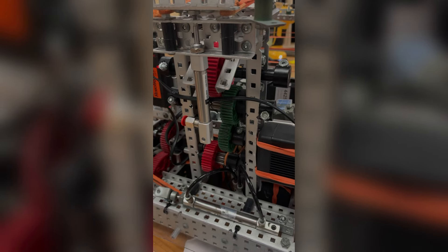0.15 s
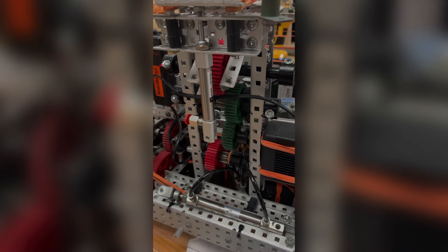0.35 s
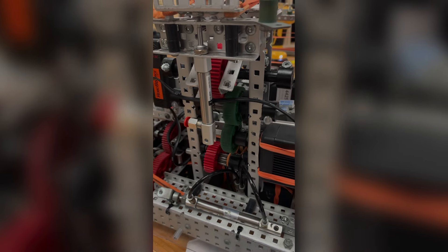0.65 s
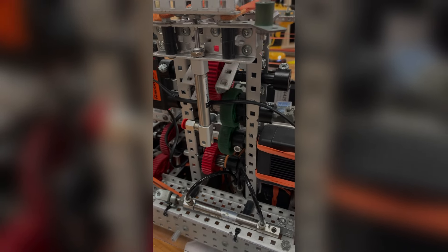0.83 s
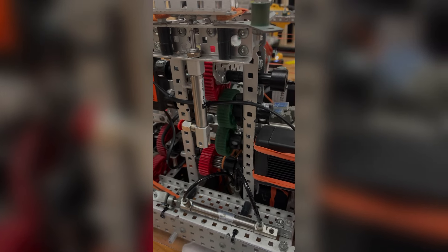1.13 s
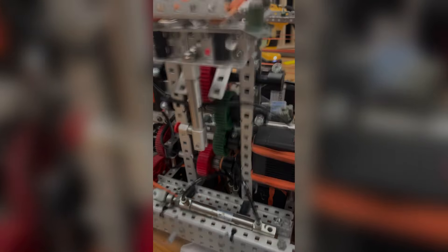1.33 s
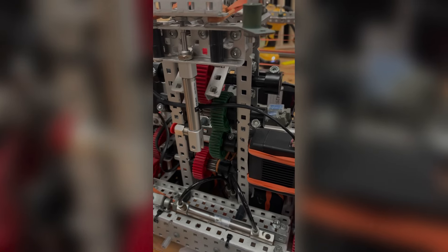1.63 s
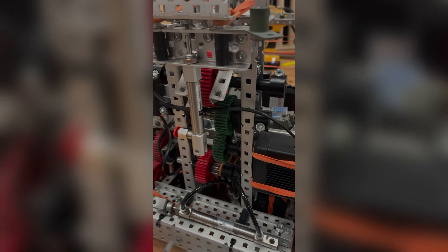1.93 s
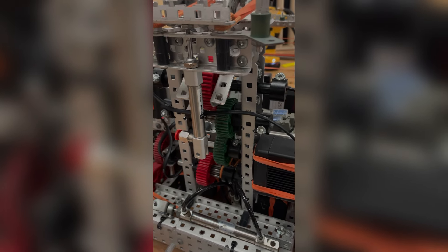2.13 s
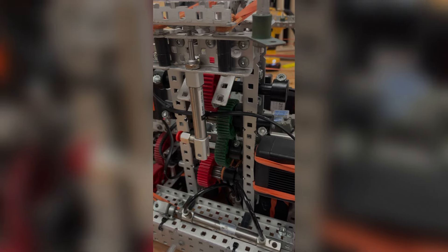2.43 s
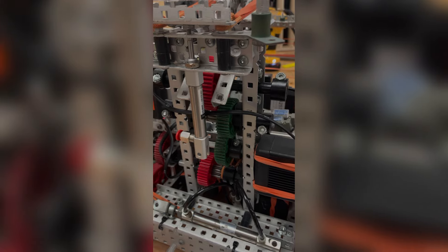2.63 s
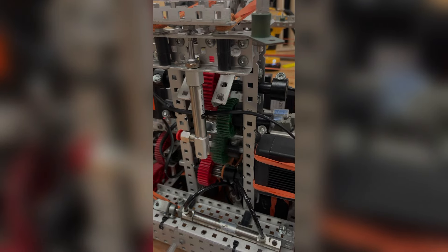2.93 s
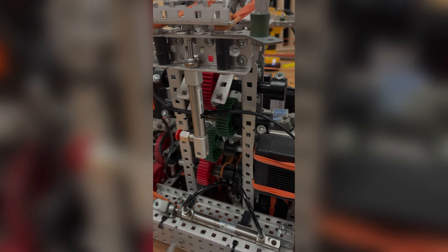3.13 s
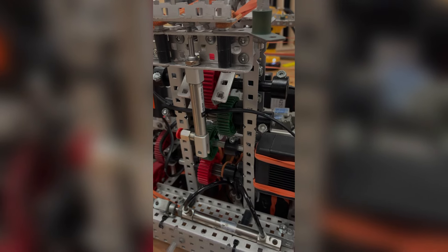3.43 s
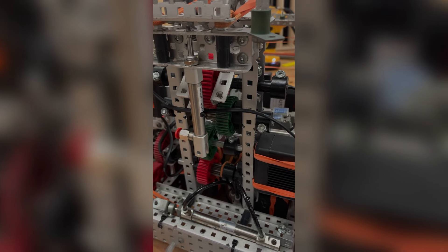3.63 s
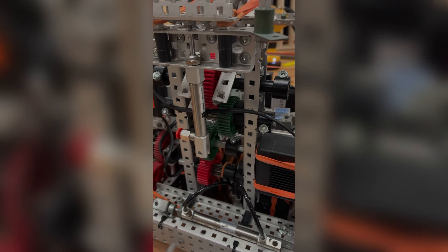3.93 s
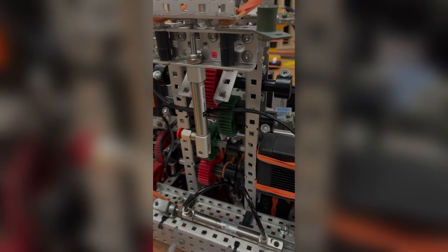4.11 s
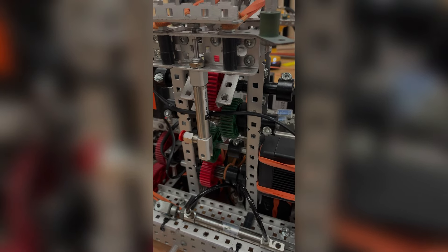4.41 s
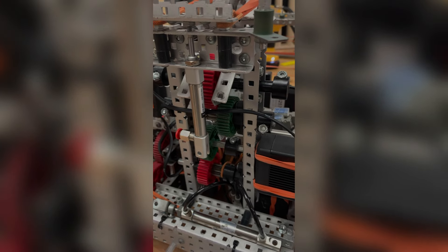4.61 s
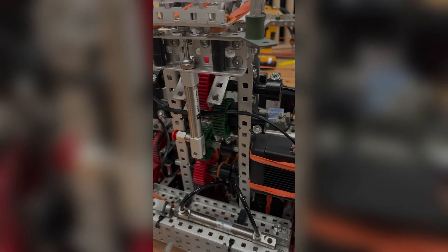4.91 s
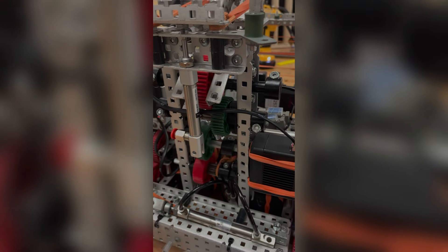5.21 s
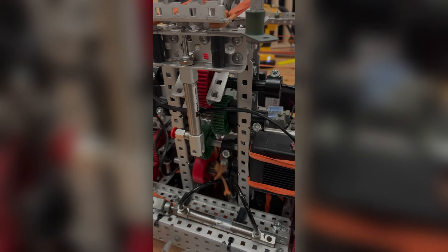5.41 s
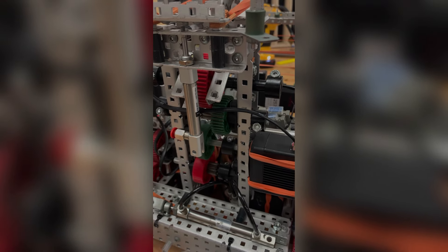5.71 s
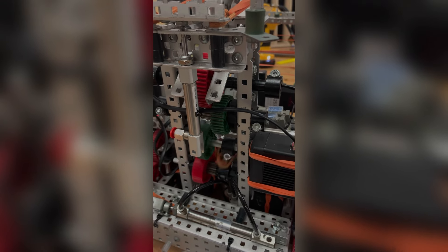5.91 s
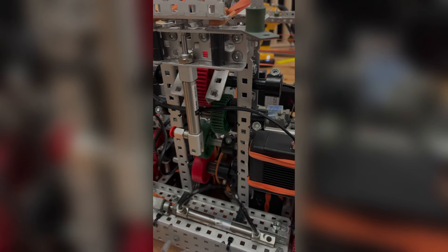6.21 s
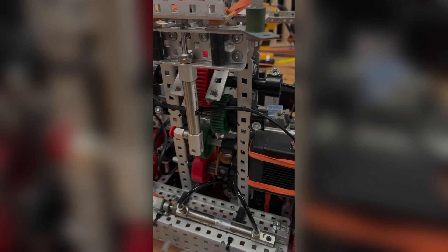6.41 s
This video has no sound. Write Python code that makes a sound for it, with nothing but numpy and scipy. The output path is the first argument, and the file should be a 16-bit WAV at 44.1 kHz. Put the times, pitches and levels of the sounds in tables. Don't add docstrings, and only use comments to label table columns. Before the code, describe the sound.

Close phone pickup of a small metal robot on a workshop bench. After faint handling, a geared motor snaps on, spins up, then sags into a strained whine. It stops amid a rattling cluster of metal slams, air hiss and low frame thumps. Quiet follows, broken by sharp plate clacks and small valve puffs, before the motor restarts with a lighter whir that runs to the end.

```python
import sys
import numpy as np
from scipy import signal
from scipy.fft import rfft, irfft, next_fast_len
from scipy.io import wavfile
from scipy.ndimage import uniform_filter1d, minimum_filter1d, map_coordinates

SR = 44100
rng = np.random.default_rng(int(sys.argv[2]) if len(sys.argv) > 2 else 0)


def amplitude_ratio(level_db):
    exponent = np.asarray(level_db, float) / 20
    return 10 ** exponent


def materialize(psi):
    bounded = np.clip(np.atleast_2d(psi).T, -1, 1)
    quanta = np.round(bounded * 32767).astype(np.int16)
    wavfile.write(sys.argv[1], SR, quanta)


N = 289296

# time in seconds, gear hiss in dB, tooth strain in dB.
LOADED_RUN = [
    (0.581, -58, -17),
    (0.599, -27, -8),
    (.63, -24, -16),
    (0.689, -18, -18.5),
    (.8, -19, -10),
    (0.825, -22.5, -3),
    (1.0, -24.5, -3.5),
    (1.14, -26.5, -2.5),
    (1.271, -27.5, 1),
]
# frequency in Hz, lead in half turns.
PORT_LEAD = [(350, -.16), (600, -.42), (1100, -.5), (1450, .25), (2400, .7), (3100, .35), (4640, 1),
             (6900, 2)]
COAST_S = 0.027


def unit(x):
    return x / np.sqrt(np.mean(x ** 2) + 1e-20)


def colour(points):
    f, db = np.transpose(points)
    return lambda hz: amplitude_ratio(np.interp(np.log(hz + 1), np.log(f), db))


def curves(rows):
    s, *cols = np.transpose(rows)
    return [np.interp(np.arange(N) / SR, s, c) for c in cols]


def wobble(rate_hz):
    knots = rng.standard_normal(int(N * rate_hz / SR) + 4)
    fine = map_coordinates(knots, [np.arange(8 * len(knots)) / 8])
    return np.interp(np.arange(N) * rate_hz * 8 / SR, np.arange(len(fine)), fine)


def filtered(x, response):
    m = next_fast_len(N + SR // 2)
    return irfft(rfft(x, m) * response(np.fft.rfftfreq(m, 1 / SR)), m)[..., :N]


def modes(table):
    def response(f):
        total = 0
        for k, (centre, width, db) in enumerate(table):
            total = total + (-1) ** k * amplitude_ratio(db) * 1j * f * width / (centre ** 2 - f * f + 1j * f * width)
        return total
    return response


def field(shape, tall, wide):
    rough = uniform_filter1d(rng.standard_normal(shape), tall, 0)
    return unit(uniform_filter1d(uniform_filter1d(rough, tall, 0), wide, 1))


def rush(response, patchy_db):
    _, _, z = signal.stft(rng.standard_normal(N), SR, nperseg=512)
    patched = signal.istft(z * amplitude_ratio(patchy_db * field(z.shape, tall=4, wide=8)), nperseg=512)[1][:N]
    return unit(filtered(patched, response))


def swells(rows):
    t, power = np.arange(N) / SR, 0
    for s, *db, rise, t60 in rows:
        u = np.maximum(t - s, 0)
        fall = amplitude_ratio(-60 * np.maximum(u - rise, 0) / max(t60, .03))
        shape = np.minimum(u / max(rise, .002), 1) ** 2 * fall
        power = power + (amplitude_ratio(db)[:, None] * shape) ** 2
    return np.sqrt(power)


def drive():
    # time in seconds, gear hiss in dB, tooth strain in dB.
    light_run = [
        (4.996, -36, -16),
        (5.022, -24, -21),
        (5.05, -18, -27),
        (5.23, -19.5, -15),
        (5.3, -20, -24),
        (5.313, -26.5, -15),
        (5.62, -25, -26),
        (6.0, -25, -13.5),
        (6.56, -25, -17.5),
    ]

    def off(row, shift_s):
        return (row[0] + shift_s, -110, row[2])

    first, last, again = LOADED_RUN[0], LOADED_RUN[-1], light_run[0]
    return curves([off(first, -COAST_S), *LOADED_RUN, off(last, 2 * COAST_S), off(again, -COAST_S), *light_run])


def motor():
    # time in seconds, speed in turns/s.
    rotor_speed = [(.56, 212), (.62, 200), (.69, 222), (.8, 222), (.832, 172), (.87, 169), (.888, 162),
                   (.925, 164), (.945, 160), (.986, 161.5), (1.002, 158), (1.044, 159.5), (1.07, 150),
                   (1.146, 144.5), (1.196, 146), (1.218, 140), (1.255, 145), (1.3, 143), (4.9, 225)]
    # multiple of the tooth rate, level in dB.
    mesh = [(1, -3), (2, 1), (3, 5), (4, 2), (5, -1), (6, -6)]
    # frequency in Hz, width in Hz, level in dB.
    case = [(452, 40, -27), (1360, 300, -16), (1950, 400, -17), (2950, 800, -9), (4500, 1500, -11),
            (5600, 450, -5.5), (7080, 500, -.5), (8250, 400, 0), (9100, 900, -8), (9730, 200, -7),
            (10250, 400, -8), (11200, 400, -1), (12050, 300, -9), (12900, 1200, -13), (15000, 1800, -13)]
    mount_hz, mount_width_hz = 166, 30

    (speed,), (hiss_db, strain_db) = curves(rotor_speed), drive()
    slack = np.clip((speed - 175) / 45, 0, 1)
    turn = 2 * np.pi * np.cumsum(speed * (1 + (.004 + .018 * slack) * wobble(90))) / SR
    stage = np.cos(turn / 4.0 + 1.7 * wobble(3.3))
    throb_db = (2.5 - 1.1 * slack) * stage + 1.5 * np.cos(turn) + wobble(300) + wobble(25)
    hiss = unit(amplitude_ratio(throb_db) * rush(modes(case), patchy_db=2.4))

    grid_hz = np.arange(500, SR // 2, 50)
    case_gain = np.abs(modes(case)(grid_hz)) ** .6
    whine = 0
    for k, db in mesh:
        level = amplitude_ratio(db + 3 * wobble(45)) * np.interp(10 * k * speed, grid_hz, case_gain)
        whine = whine + level * np.sin(10 * k * turn + .5 * wobble(400))

    surge, = swells([(LOADED_RUN[0][0] - COAST_S, -40, .03, 0.4)])
    detune = 2 * (speed - mount_hz) / mount_width_hz
    hum_gain = amplitude_ratio(hiss_db - 26 + 0.75 * strain_db + 2 * wobble(33) + 5) / np.sqrt(1 + detune ** 2) + surge
    hum = (np.sin(turn) + amplitude_ratio(-12.5) * np.sin(2 * turn)) * hum_gain
    gears = hiss + amplitude_ratio(strain_db + 1.0 + 1.9 * stage) * whine
    return amplitude_ratio(hiss_db + 0.57 * wobble(9.4)) * gears + amplitude_ratio(2) * hum


def slams():
    # start in seconds, crack, knock and thud in dB, chatter t60 in seconds.
    contacts = [(0.4294, -63, -54, -61, .028), (0.5799, -16, -35, -57.5, 0.012),
                (0.611, -11.5, -37.5, -57, 0.024), (1.278, -10.5, -25.5, -28.5, .025),
                (1.3397, -12, -25.5, -49.5, .03), (1.3453, -3, -30, -45.5, 0.022),
                (1.3527, -4.5, -27.5, -33.5, .03), (1.3559, -8, -29, -33, 0.033),
                (1.359, -8.5, -28, -36, 0.037), (1.3674, -10, -28, -35, 0.027),
                (1.4297, -10.5, -33.5, -25.5, 0.023), (1.4329, -13, -32.5, -30.5, .02),
                (1.5068, -17.5, -35.5, -32, 0.015), (1.5108, -5, -37, -32, 0.024),
                (1.581, -6.5, -35, -29.5, 0.017), (1.6327, -12, -44, -26.5, 0.022),
                (1.652, -23, -51, -30.5, 0.023), (1.4499, -15.5, -45.5, -52.5, 0.023),
                (1.472, -19.5, -44.5, -49, 0.027), (1.9147, -50.5, -42.5, -35, 0.15),
                (2.8959, -23.5, -29, -41.5, 0.013), (2.9371, -28, -40, -32, 0.042),
                (2.9427, -2.5, -13.5, -21, 0.016), (2.9458, -8.5, -34, -10, 0.022),
                (2.9507, -16.5, -21, -39, 0.044), (3.1469, -32, -43, -59.5, 0.035),
                (3.152, -1.5, -20, -46, .015), (3.1538, -9, -22, -67, 0.019),
                (3.394, -38, -78.5, -80.5, 0.0065), (3.7187, -7, -18.5, -41.5, 0.016),
                (3.7255, -16.5, -18.5, -49.5, 0.02), (3.759, -20.5, -33, -25, 0.037),
                (3.7659, -5, -15, -11.5, 0.024), (3.7686, -7, -17, -15.5, 0.013),
                (3.7745, -15, -36, -17.5, 0.012), (4.9863, -17.5, -33, -50, 0.0088),
                (4.997, -16, -36, -58, 0.0117), (2.632, -64, -55, -80, 0.015),
                (5.301, -14, -36, -57, 0.009)]
    # frequency in Hz, level in dB.
    crack_colour = [(1500, -20.5), (3000, -11), (5500, 5.5), (8000, -1.5), (11000, 0.5), (14500, -2.5),
                    (16000, -3.5)]
    # frequency in Hz, width in Hz, level in dB.
    channel = [(2700, 470, -24.5), (5580, 360, 5.5), (6970, 43, 1), (6900, 390, 4.5), (7490, 17, -7),
               (7060, 57, -9), (8600, 90, -1.5), (9400, 350, 4), (10030, 260, -3.5), (11000, 200, -2.5),
               (13000, 81, -5.5), (13800, 150, -5.5)]
    plates = modes([(1150, 33, -1.0), (2150, 460, 0.5), (744, 140, -2.0)])

    crack, knock, thud, t = np.zeros(N), np.zeros(N), np.zeros(N), np.arange(SR // 8) / SR
    push = np.sin(2 * np.pi * 10.0 * np.sqrt(t * 8.5))
    chatter = rng.standard_normal((len(contacts), 2, len(t)))
    for (s, db, knock_db, thud_db, t60), z in zip(contacts, chatter):
        fall = amplitude_ratio(-60 * t / max(t60, .006)) * (1 - np.exp(-t / 0.00023))
        at = slice(round(s * SR), round(s * SR) + len(t))
        crack[at] += amplitude_ratio(db - 1.5) * fall * z[0]
        knock[at] += amplitude_ratio(knock_db + 12.5) * fall * z[1]
        thud[at] += amplitude_ratio(thud_db - 1.5 - 60 * t / 0.048) * (1 - np.exp(-t / .0008)) * push

    def ringing(hz):
        return colour(crack_colour)(hz) * amplitude_ratio(0.5) + amplitude_ratio(4) * modes(channel)(hz)

    return filtered(crack, ringing) + filtered(knock, plates) + thud


def bumps():
    # start in seconds, level in dB, pitch in Hz.
    drops = [
        (1.3712, -7, 90),
        (1.4075, -13.5, 133.7),
        (1.418, -14.5, 94.4),
        (1.4492, -16, 115),
        (1.4761, -9, 120),
        (1.4843, -10, 100),
    ]
    out, t = np.zeros(N), np.arange(SR // 8) / SR
    for s, db, hz in drops:
        swing = amplitude_ratio(db + 5.5 - 60 * t * hz / 2.3) * np.sin(2 * np.pi * hz * t)
        out[round(s * SR):][:len(t)] += swing * (1 - np.exp(-t / 0.0028))
    return out


def knocks():
    # start in seconds, level in dB, pitch in Hz, upper tick in dB.
    plastic = [(0.536, -25.5, 563, -14.5), (0.684, -28, 690, 8), (1.402, -26, 274, -9),
               (1.574, -6, 428, -37), (1.576, -16, 386, -28), (1.597, -12, 287, -34),
               (1.584, -16, 300, -34), (1.884, -32.5, 1027, -17), (3.145, -47, 900, 1),
               (3.568, -50, 1200, -16), (3.612, -34.5, 850, -18), (3.894, -33, 1150, -21),
               (4.4, -42, 1100, 2), (4.431, -31.5, 1200, -16), (4.763, -41, 1194, -25),
               (4.946, -24.5, 566, -20), (5.05, -29, 1150, 3), (5.115, -17.5, 695, 3.5)]
    out, t = np.zeros(N), np.arange(SR // 16) / SR
    tick = np.sin(2 * np.pi * 1980 * t)
    for (s, db, hz, tick_db), grit in zip(plastic, rng.standard_normal((len(plastic), len(t)))):
        swell = amplitude_ratio(db + 10.5 - 60 * t / (0.0099 + 1.0 / hz)) * (1 - np.exp(-t / 0.0018))
        body = np.sin(2 * np.pi * hz * t) + 0.31 * np.sin(2 * np.pi * 2.1 * hz * t)
        out[round(s * SR):][:len(t)] += swell * (body + amplitude_ratio(tick_db) * tick + amplitude_ratio(-22.0) * grit)
    return out


def pings():
    # start in seconds, level in dB, pitch in Hz, t60 in seconds.
    jolts = [(.579, -23, 6900, 0.014), (1.57, -14.5, 1040, .04), (1.57, -23, 1403, 0.055),
             (1.6, -24.5, 1005, 0.046), (1.606, -19.5, 894, 0.076), (1.628, -26.5, 500, 0.091),
             (1.71, -27.5, 307.4, .07), (1.726, -35, 199.6, 0.081), (1.739, -27, 287.6, .06),
             (1.79, -34.5, 209, .1), (1.805, -38.5, 350, .05), (2.628, -67.5, 958, 0.054),
             (2.706, -54, 2055, 0.041), (3.719, -24, 856, 0.038), (3.72, -30, 4400, .03),
             (4.666, -48, 2000, 0.025), (5.299, -15.5, 10000, .04), (5.294, -20, 5650, .04)]
    out, t = np.zeros(N), np.arange(SR // 8) / SR
    for (s, db, hz, t60), z in zip(jolts, rng.standard_normal((len(jolts), len(t)))):
        drift = 8 * uniform_filter1d(z, 200)
        ring = amplitude_ratio(db + 3 - 60 * t / t60) * np.sin(2 * np.pi * hz * t + drift)
        out[round(s * SR):][:len(t)] += ring * (1 - np.exp(-t / .002))
    return out


def tank():
    # start in seconds, level in dB.
    taps = [
        (3.563, -41),
        (3.601, -39),
        (4.405, -46.5),
        (4.428, -45),
    ]
    gain, = swells([(s, db, 0.01, 0.14) for s, db in taps])
    return gain * np.sin(2 * np.pi * np.cumsum(325 * (1 + 0.043 * wobble(40))) / SR)


def stirred_db():
    # start in seconds, jet and rustle in dB, rise and t60 in seconds.
    puffs = [(-.03, -53.5, -47.5, 0.064, 0.95), (.18, -88, -50, 0.05, 0.53), (.427, -56, -53, 0.004, 1),
             (1.27, -30, -42, 0.013, 0.46), (1.338, -19.5, -26, 0.0036, 0.5),
             (1.385, -25, -33.5, 0.012, 0.48), (1.45, -27, -31.5, 0.023, 0.29),
             (1.52, -42.5, -33.5, 0.0084, 0.19), (1.572, -53.5, -34.5, 0.012, 0.2),
             (1.62, -40.5, -43, 0.016, 0.85), (1.91, -46, -50.5, 0.02, 0.12), (2.22, -59, -61, 0.033, 1),
             (2.44, -62.5, -67.5, 0.031, 0.34), (2.706, -62, -64, 0.0049, 0.62),
             (2.934, -40, -49, 0.011, 0.58), (3.135, -41.5, -55, 0.0077, 0.48),
             (3.27, -60.5, -90, 0.055, 1), (3.556, -61.5, -45.5, 0.013, 1),
             (3.578, -42.5, -57, 0.016, 0.61), (3.765, -35, -64, 0.011, 0.31),
             (3.84, -44, -40.5, 0.07, 0.84), (3.99, -41, -51, 0.015, 0.67), (4.255, -53.5, -52, 0.031, 1),
             (4.385, -37.5, -44.5, 0.046, 0.87), (4.755, -53.5, -52, 0.017, 1)]
    # start in seconds, boom and deep in dB, rise and t60 in seconds.
    rocking = [(0, -51, -57.5, 0.0017, 1.3), (.25, -58, -54.5, 0.034, 1.1), (.43, -58, -66.5, 0.0083, 0.99),
               (.53, -52.5, -50, 0.013, 1), (.65, -50, -45.5, 0.031, 1.2),
               (1.28, -43.5, -38.5, 0.0092, 0.27), (1.35, -29, -22.5, 0.012, 1),
               (1.45, -28.5, -25.5, 0.022, 0.58), (1.56, -24.5, -37.5, 0.028, 0.35),
               (1.65, -34, -45, 0.03, 0.8), (1.92, -57, -56, 0.022, 2.2), (2.1, -63, -57, 0.079, 1.8),
               (2.92, -41, -41, 0.019, 0.51), (3.1, -68.5, -49, 0.027, 0.41),
               (3.56, -52.5, -74.5, 0.043, 1.4), (3.76, -37, -27, 0.015, 0.057),
               (3.85, -48.5, -55, 0.035, 1.2), (4.08, -60.5, -67, 0.019, 0.99),
               (4.26, -61.5, -62, 0.023, 0.69), (4.4, -52.5, -70.5, 0.034, 0.44),
               (4.52, -61, -77, 0.03, 1.3), (4.755, -59.5, -73, 0.017, 1.4)]
    # jet, rustle, boom, deep in dB.
    quiet_db = [-79, -89.5, -85.5, -65]
    hiss_db, strain_db = drive()
    over_hiss_db = np.array([-47.5 + 0 * strain_db, -18 + 0.63 * strain_db,
                             -32 + 0.17 * strain_db, -31.5 + 0.22 * strain_db])
    gains = np.vstack([swells(puffs), swells(rocking)])
    return 10 * np.log10(gains ** 2 + amplitude_ratio(hiss_db + over_hiss_db) ** 2 + amplitude_ratio(quiet_db)[:, None] ** 2)


def venting(jet_db):
    # frequency in Hz, level in dB.
    jet_colour = [(1500, -22), (3000, -6), (5500, -1.5), (6500, -5), (8000, -23.5), (11000, -28.5)]
    # frequency in Hz, width in Hz, level in dB.
    nozzle = [(5200, 49, -10.5), (7140, 27, -1.5), (6660, 36, -1.5), (7800, 51, -2), (8130, 43, -7)]
    # frequency in Hz, level in dB.
    fizz_colour = [(4000, -32.5), (7000, -1.5), (8500, 3.5), (11000, -1), (13500, -4.5), (15500, -8.5)]

    def whistling(hz):
        return colour(jet_colour)(hz) * (1 + amplitude_ratio(-2.5) * np.abs(modes(nozzle)(hz)))

    gust_db = 1.5 * wobble(60)
    jet = amplitude_ratio(jet_db - 3.0 + gust_db) * rush(whistling, patchy_db=3.0)
    fizz_gain = amplitude_ratio(jet_db - 0.5 + 1.4 * np.minimum(jet_db + 50.5, 0) + gust_db)
    workshop_air = amplitude_ratio(-87 + 1.5 * wobble(4))
    return jet + (fizz_gain + workshop_air) * rush(colour(fizz_colour), patchy_db=3.0)


def rustling(rustle_db):
    # frequency in Hz, level in dB.
    rub_colour = [(250, -31), (450, -13.5), (700, 1), (1200, 7), (2000, 0.5), (3500, -8), (6000, -18.5),
                  (12000, -52)]
    return amplitude_ratio(rustle_db + 1.3 * wobble(40)) * rush(colour(rub_colour), patchy_db=2.1)


def shaking(boom_db, deep_db):
    # frequency in Hz, level in dB.
    plate_colour = [(110, -31.5), (170, 5), (250, -2), (380, -1.5), (520, -8.5), (750, -34)]
    # frequency in Hz, level in dB.
    sway_colour = [(26, -26), (40, -5), (60, 4), (80, -2.5), (120, 5.5), (165, -10.5), (220, -51)]
    boom = amplitude_ratio(boom_db + 0.21 * wobble(30)) * rush(colour(plate_colour), patchy_db=3.0)
    return boom + amplitude_ratio(deep_db + 0.59 * wobble(16)) * rush(colour(sway_colour), patchy_db=3.0)


def squeak():
    # time in seconds, pitch in Hz, level in dB.
    creep = [
        (3.46, 3620, -110),
        (3.48, 3620, -69),
        (3.54, 3600, -66),
        (3.56, 3600, -110),
    ]
    hz, db = curves(creep)
    return amplitude_ratio(db + 3.5 * wobble(70)) * np.sin(2 * np.pi * np.cumsum(hz * (1 + .015 * wobble(120))) / SR)


def room(x):
    # frequency in Hz, t60 in seconds.
    decay = [(200, 0.74), (5000, 0.93), (9000, 0.061), (14000, 0.03)]
    hz, t, z = signal.stft(rng.standard_normal(SR), SR, nperseg=256)
    t60 = np.interp(hz, *np.transpose(decay))
    tail = signal.istft(z * amplitude_ratio(-60 * t / t60[:, None]), SR, nperseg=256)[1]
    return signal.fftconvolve(np.pad(x, (300, 0)), tail / np.linalg.norm(tail))[:N]


def mains():
    # frequency in Hz, level in dB.
    hum_lines = [(60, -64), (120, -73), (240, -80), (335, -82)]
    t, out = np.arange(N) / SR, np.zeros(N)
    for hz, db in hum_lines:
        out += amplitude_ratio(db + 2.1 * wobble(5)) * np.sin(2 * np.pi * hz * t + 1.8 * wobble(9))
    return out


def scene():
    hits = slams() + bumps() + knocks() + pings() + tank()
    jet_db, rustle_db, boom_db, deep_db = stirred_db()
    stirred = venting(jet_db) + rustling(rustle_db) + shaking(boom_db, deep_db)
    mono = motor() + hits + stirred + squeak() + amplitude_ratio(-20.5) * room(hits) + mains()
    return np.array([mono, mono])


def two_ports(mono):
    low_cut_hz, top_hz, notch_step_hz = 36, 15750, 2075

    def half_lead(hz):
        lead = np.interp(hz, *np.transpose(PORT_LEAD)) * np.minimum(hz / PORT_LEAD[0][0], 1) ** 1.6
        delay = np.maximum(hz - PORT_LEAD[-1][0], 0) / notch_step_hz
        return np.pi / 2 * (lead + delay)

    def response(hz):
        band = hz ** 4 / (hz ** 4 + low_cut_hz ** 4) / (1 + (hz / top_hz) ** 400)
        return band * np.array([np.cos(half_lead(hz)), 1j * np.sin(half_lead(hz))])

    return filtered(mono, response)


def muting(hz, z):
    f = hz[:, None]
    own = uniform_filter1d(uniform_filter1d(np.abs(z) ** 2, 6, 1), 3, 2)
    power = np.sum(np.abs(z) ** 2, 0)
    treble = power[hz > 3500].sum(0)
    past_min = np.roll(minimum_filter1d(treble, 5), 3)
    coming_max = -np.roll(minimum_filter1d(-treble, 5), -3)
    click = (treble > 2.3 * uniform_filter1d(treble, 9)) | (past_min > 1.7 * coming_max)
    mask = uniform_filter1d(own.sum(0), 42, 0) * amplitude_ratio(-19 + 3 * field(power.shape, tall=18, wide=5))
    strong = (own > mask) | (own > (.18 + f / 80000) * own.sum(0)) | (f < 3500) | click
    in_band = np.minimum(np.arange(len(hz)), len(hz) - 4)
    strong = np.repeat(strong[:, 3::6], 6, axis=1)[:, in_band]
    nearby = uniform_filter1d(uniform_filter1d(power, 24, 0), 2, 1)
    floor = amplitude_ratio(2 * np.interp(hz, [4000, 12500, 15000], [-120, -118, -112]))[:, None]
    faint = floor + (f > 12500) * treble * amplitude_ratio(-80)
    return strong * (nearby > faint * amplitude_ratio(9 * field(power.shape, tall=5, wide=6)))


def band_limit(x):
    return signal.sosfilt(signal.butter(12, 16980, fs=SR, output="sos"), x)


def record(dry):
    # frequency in Hz, wander of the side's phase in rad.
    scatter = [(300, .1), (700, 1.3), (2500, 1.1), (4500, 0.45), (15000, .9)]
    hz, _, z = signal.stft(two_ports(dry[0]), SR, nperseg=1024)
    wander_rad = np.interp(hz, *np.transpose(scatter))[:, None] * field(z.shape[1:], tall=6, wide=1)
    z[1] *= np.exp(1j * wander_rad)
    mid, side = signal.istft(z * muting(hz, z), nperseg=1024)[1][:, :N]
    ports = np.array([mid + side, mid - side])
    ports = ports / (1 + np.abs(ports / .9) ** 5) ** (1 / 5)
    return band_limit(ports)


dry = scene()
out = record(dry)
materialize(out)
```